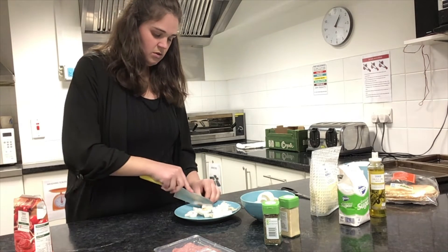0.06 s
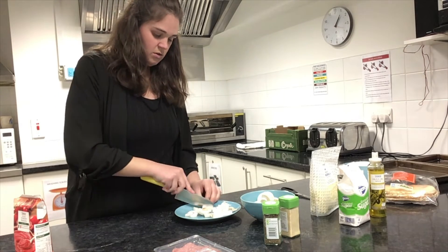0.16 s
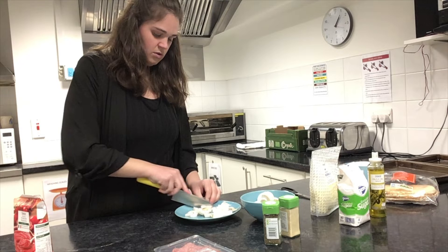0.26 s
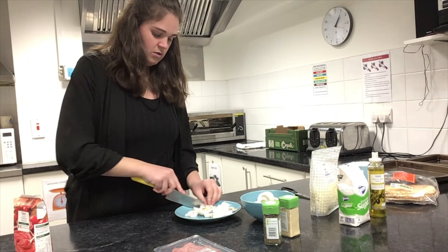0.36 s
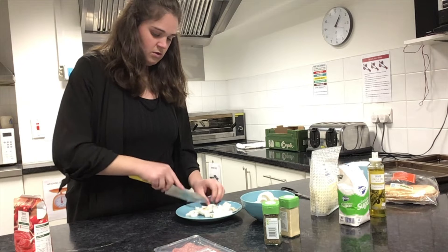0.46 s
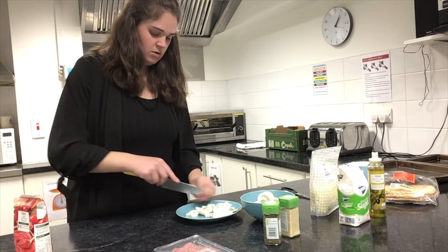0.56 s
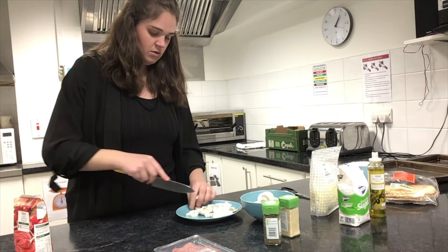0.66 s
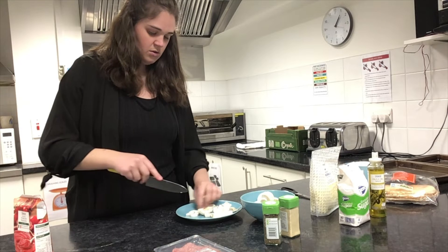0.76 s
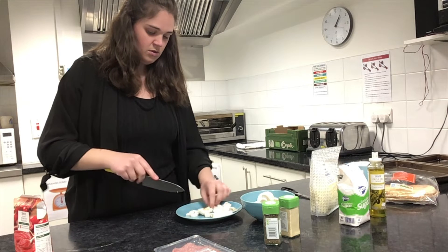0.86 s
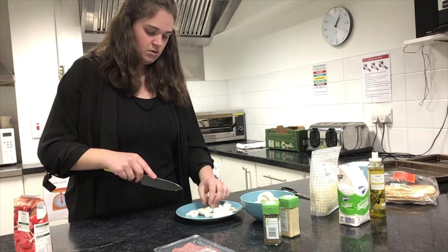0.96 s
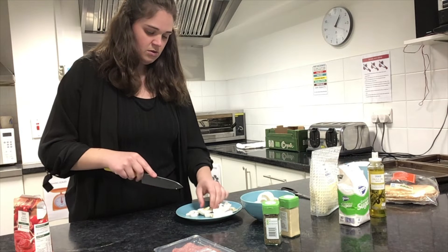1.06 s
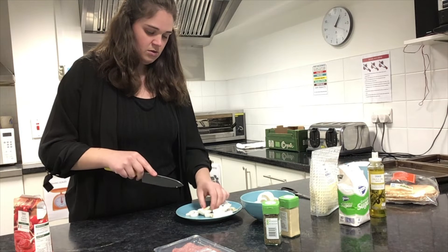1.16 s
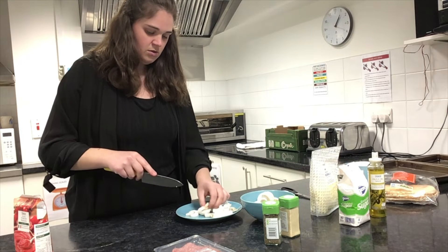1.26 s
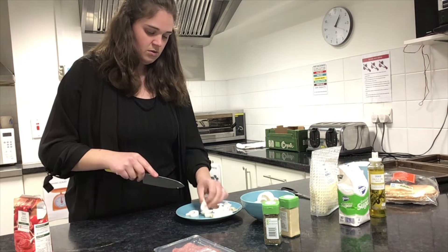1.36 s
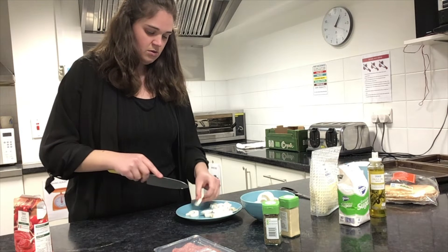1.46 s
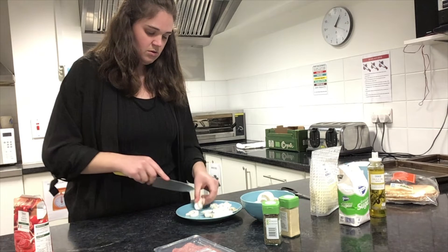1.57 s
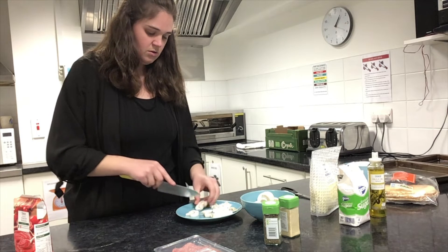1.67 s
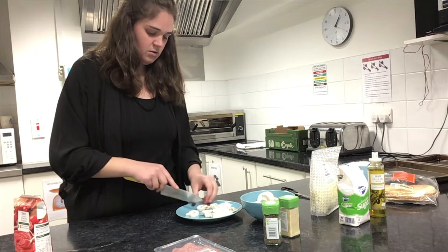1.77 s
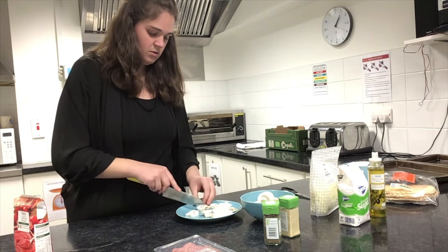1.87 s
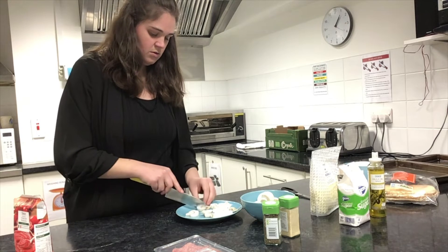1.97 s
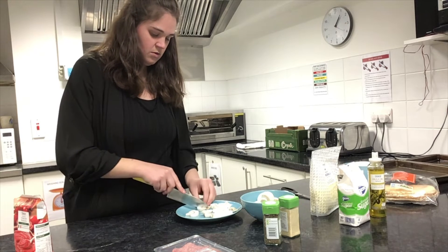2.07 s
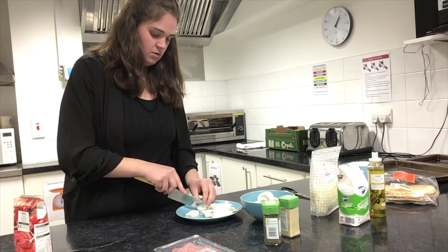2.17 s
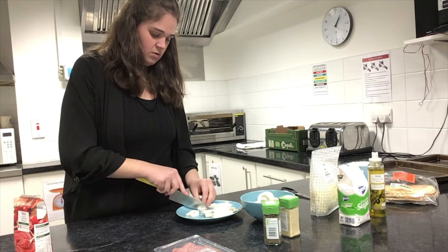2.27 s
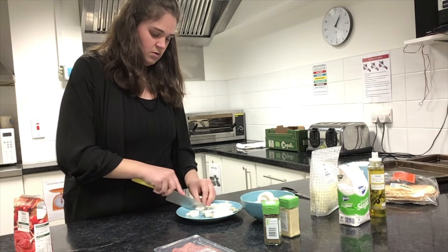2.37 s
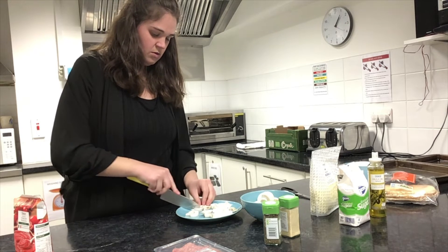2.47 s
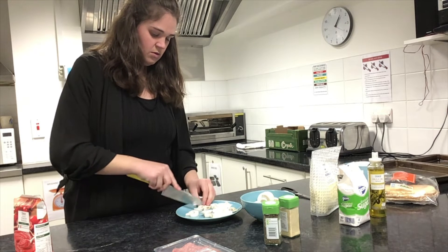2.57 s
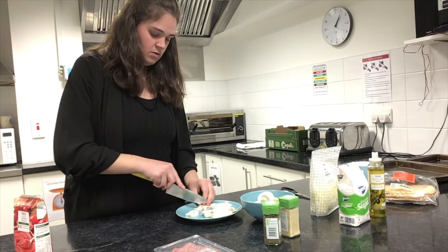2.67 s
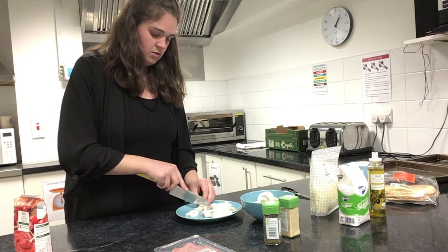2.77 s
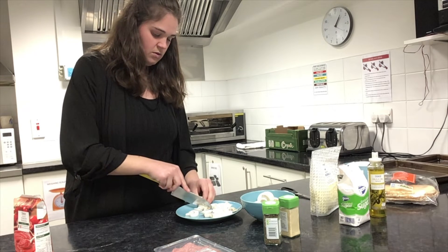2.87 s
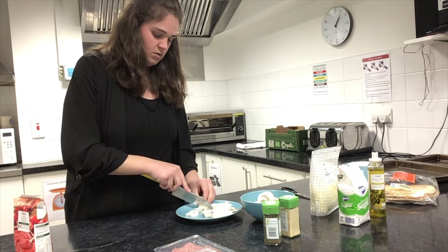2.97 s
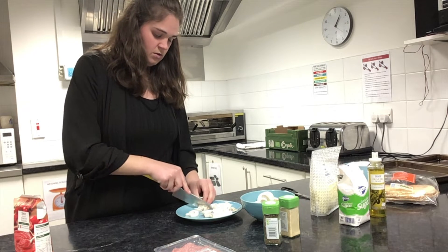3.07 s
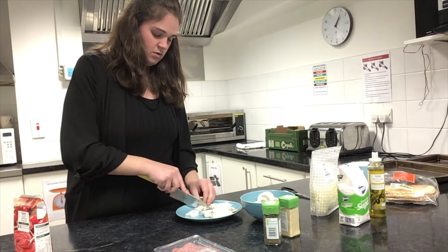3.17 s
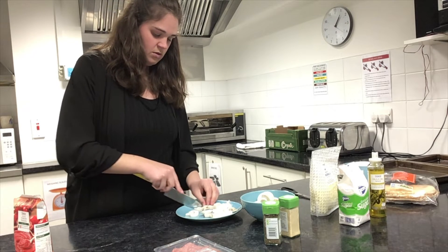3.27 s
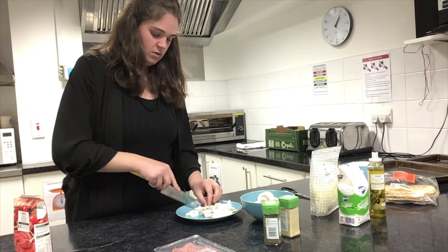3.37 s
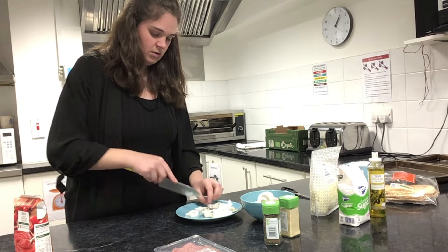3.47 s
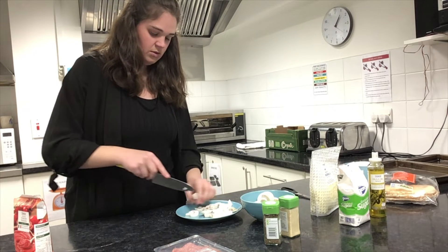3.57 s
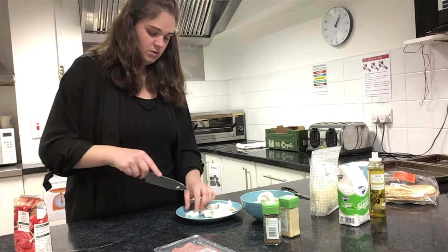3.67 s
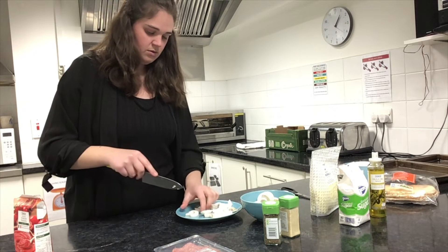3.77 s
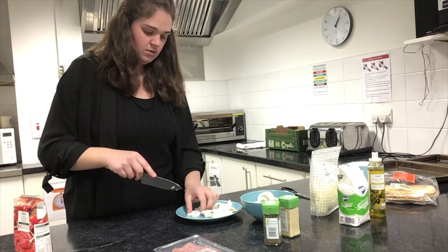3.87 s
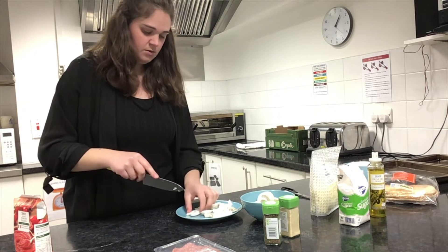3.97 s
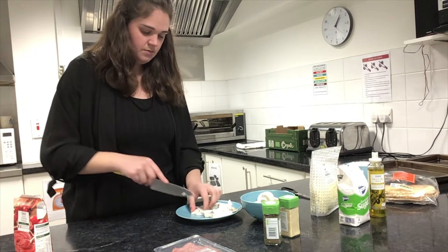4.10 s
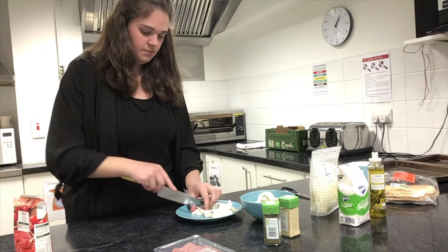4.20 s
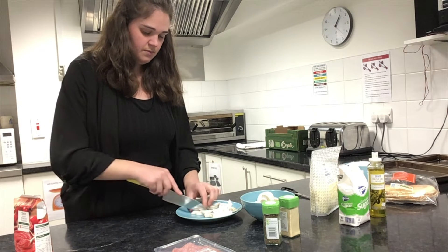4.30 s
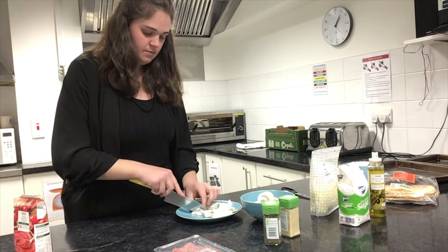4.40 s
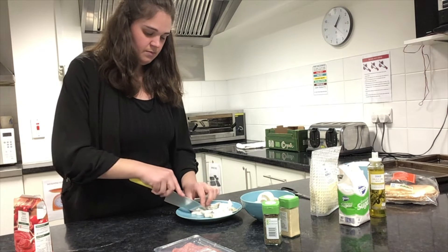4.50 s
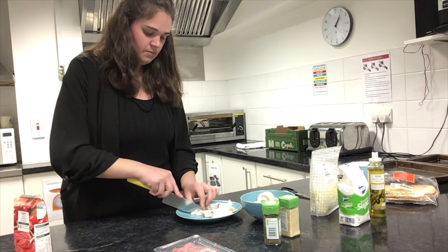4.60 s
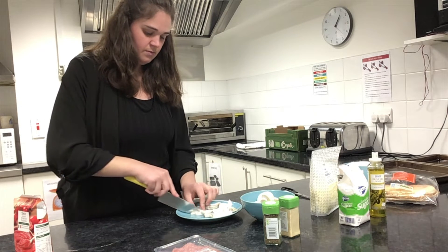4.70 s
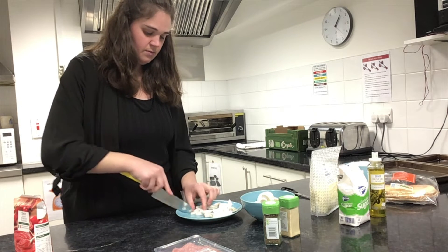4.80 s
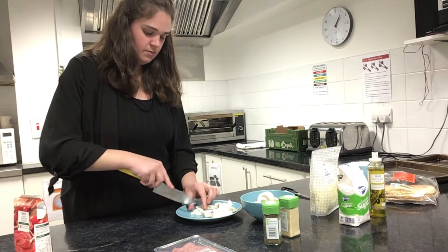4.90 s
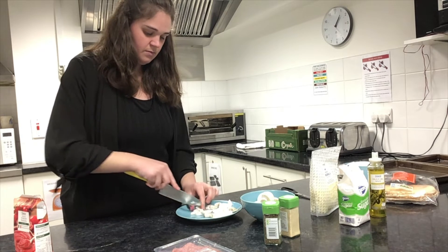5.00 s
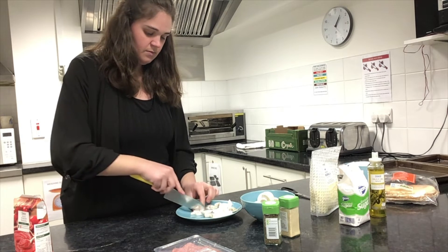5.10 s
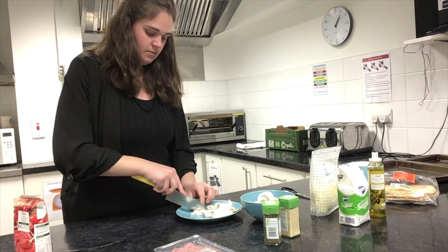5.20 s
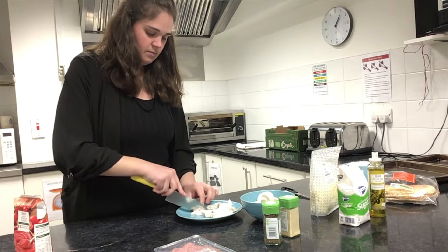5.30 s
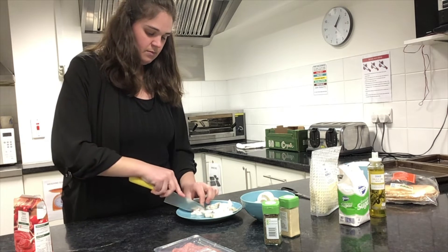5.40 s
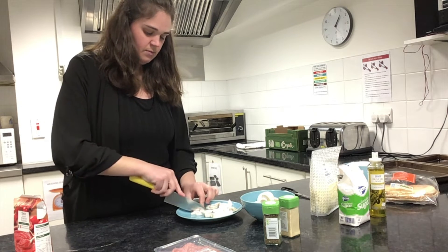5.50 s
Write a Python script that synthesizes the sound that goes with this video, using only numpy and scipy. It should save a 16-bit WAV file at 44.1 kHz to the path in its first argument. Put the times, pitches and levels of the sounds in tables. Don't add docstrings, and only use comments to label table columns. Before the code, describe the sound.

A knife cracks sharply onto a ceramic plate five times, with lighter clinks between, in a tiled kitchen over a faint low hum.

```python
import sys
import numpy as np
from scipy import signal
from scipy.fft import rfft, irfft
from scipy.io import wavfile
from scipy.ndimage import uniform_filter1d

SR = 44100
rng = np.random.default_rng(int(sys.argv[2]) if len(sys.argv) > 2 else 0)


def persist_wave(psi):
    counts = np.round(np.clip(psi, -1, 1) * 32767).astype(np.int16)
    wavfile.write(sys.argv[1], SR, np.atleast_2d(counts).T)


def to_linear_factor(level_db):
    exponent = np.asarray(level_db, float) / 20
    return 10 ** exponent


N = 244622

# freq_hz, level_db
STEADY_BAND = [(20, -3), (45, 0), (15780, 0), (15950, -24)]
# freq_hz, under_cut_db, under_knock_db, t60_s (as heard in the room)
WELL = [(355.2, -7, -9, .25), (470, 1.5, 1, 0.18), (600, -7, -6, .12), (982.6, -3.5, -7.5, 0.22),
        (1330, -17, -14, .15), (1645, 1.1, -6, .22), (1850, -.5, -1.5, .13), (2010, -5.5, -5.5, .2),
        (2410, -9.5, -16.5, .3), (2580, -6.5, -1.3, .4), (2860, -14, -2.5, .12), (3080, -3.5, 4, .18),
        (3310, 1.5, -3, 0.17), (3605, 1.5, -.8, .33)]
# freq_hz, under_cut_db, under_knock_db, t60_s (as heard in the room)
RIM = [(3930, 2.5, 1.5, .22), (4290, -1.2, -7.5, .3), (4660, -3.5, -4.5, .3), (4855, -9, 3.5, .32),
       (5080, -14.5, -3, .25), (6080, 0, -11, .35), (6208, 0.7, 7, .3), (6650, -9, 0.7, .3),
       (7600, -7, -.8, .24), (8620, -5, -7, .24), (9250, -9, -0.8, .28), (11200, 1.5, -1, .2),
       (12780, -4.5, -2.5, .12), (14200, -1.5, -5, .18)]


def evened(x):
    return x / np.sqrt(np.mean(x ** 2) + 1e-20)


def read(points, hz):
    f, value = np.transpose(points)
    return np.interp(np.log(hz + 1), np.log(f + 1), value)


def add(mix, s, sound):
    part = mix[round(s * SR):][:len(sound)]
    part += sound[:len(part)]


def coloured(x, spectrum):
    hz = np.fft.rfftfreq(len(x), 1 / SR)
    return irfft(rfft(x) * to_linear_factor(read(spectrum, hz)), len(x))


def resonate(x, hz, width):
    r = np.exp(-np.pi * abs(width) / SR)
    return 2 * signal.lfilter([1 - r], [1, -r * np.exp(2j * np.pi * hz / SR)], x).real


def appliance():
    # freq_hz, level_db
    air_spectrum = [(15, -41.5), (25, -22.5), (69, -13.5), (101, -5.5), (169, -10), (198, -8.5),
                    (340, -13.5), (567, -12), (782, -23), (871, -20.5), (1050, -25.5), (1270, -24.5),
                    (1410, -27.5), (2630, -27.5), (15500, -44)]
    # freq_hz, width_hz, level_db
    motor = [(100, 13, -96), (71.14, 8, -80), (48.52, 5.3, -79), (140.5, 11, -75.5), (203.7, 6.6, -81.5),
             (235.3, 8.9, -78.5), (470, 14, -83.5), (506, 18, -88), (886, 26, -80), (1300, 12, -86.5),
             (2700, 19, -88)]
    air_db, mains_db, hiss_db = -65.5, -65.5, -87

    swell = rng.standard_normal(N)
    for _ in range(2):
        swell = uniform_filter1d(swell, 9000)
    air = to_linear_factor(air_db + 0.6 * evened(swell)) * evened(coloured(rng.standard_normal(N), air_spectrum))
    hiss = to_linear_factor(hiss_db) * rng.standard_normal(N)
    mains = to_linear_factor(mains_db) * np.sqrt(2) * np.sin(2 * np.pi * 99.8 * np.arange(N) / SR)
    hum = air + hiss + mains
    for hz, width, db in motor:
        line = resonate(resonate(rng.standard_normal(N), hz, width), hz, width)
        hum += to_linear_factor(db) * evened(line)
    return coloured(hum, STEADY_BAND)


def stroke(landing, db, rise_db):
    # freq_hz, level_db
    flesh = [(470, -24.5), (800, 6), (1430, -6.5), (1670, -3.5), (2510, -6.5), (4180, -3.5), (6220, -7),
             (12000, -25), (15600, -56.5), (22000, -120)]
    slide_s = 0.061
    t = np.arange(-slide_s, 0, 1 / SR)
    noise, grain = rng.standard_normal((2, SR))
    grain_db = 5.3 * evened(uniform_filter1d(grain, 90))
    fibres = evened(coloured(noise * to_linear_factor(grain_db), flesh))[:len(t)]
    return landing - slide_s, to_linear_factor(db + rise_db * t) * fibres * signal.windows.tukey(len(t), 0.1)


def touch(s, db, hz, width, length):
    t = np.arange(8192) / SR
    puff = resonate(resonate(rng.standard_normal(len(t)), hz, width), hz, width)
    return s, to_linear_factor(db) * evened(puff) * np.exp(-t / length) * np.minimum(t / 0.00089, 1)


def favoured(hz, tones, lifts_db, reaches):
    lift_db = 0
    for tone, db, reach in zip(tones, lifts_db, reaches):
        lift_db = lift_db + db * np.exp(-(np.log2((abs(hz) + 1) / tone) / reach) ** 2)
    return lift_db


def struck(spectrum, centres, strength_db, spot, bump_db):
    size = 4096
    signed_hz = np.fft.fftfreq(size, 1 / SR)
    hz = abs(signed_hz)

    height = np.clip(1 + strength_db / 14, 0, 1.5)[:, None]
    bumps = (height / (1 + ((hz / centres[:, None] - 1) / 0.016) ** 2)).max(0)
    bumps *= 1 + 0.6 * np.clip(hz / 9000, 0, 1)
    edge_db = -60 * np.clip((hz - 16000) / 700, 0, 1)
    gain_db = read(spectrum, hz) + bump_db * bumps + favoured(hz, *spot) + edge_db
    log_gain = np.log(to_linear_factor(np.maximum(gain_db, -100)))

    scatter = np.repeat(rng.random(129), 16)[:2049] * 0.004
    scatter *= np.clip(np.arange(2049) / 900, 0, 1) ** 2
    drift = 2 * np.pi * np.cumsum(scatter) * SR / size
    bins = abs(np.fft.fftfreq(size, 1 / size)).astype(int)
    bending = 4 * np.pi * 0.0014 * np.sqrt(1000 * hz)
    lag = np.sign(signed_hz) * (bending + drift[bins])

    causal_phase = signal.hilbert(log_gain).imag
    return np.fft.ifft(np.exp(log_gain - 1j * (causal_phase + lag))).real[:2048]


def ring(modes, t):
    hz, db, t60 = np.transpose(modes)[:, :, None]
    pair = np.sin(2 * np.pi * hz * t) + 0.45 * np.sin(2 * np.pi * hz * 1.011 * t)
    return (to_linear_factor(db - 60 * t / np.clip(0.67 * t60, 0.02, 0.26)) * pair).sum(0)


def blow(row, colour, radiated, favour, strength_db, ring_db):
    # start_s, free_1_hz, free_2_hz, gap_1_hz, gap_2_hz
    grips = [(0.124, 4650, 1645, 2950, 5200), (2.237, 6080, 600, 2446, 1515),
             (3.091, 3310, 970, 2590, 11200), (4.605, 2410, 4855, 2860, 5500),
             (5.408, 6080, 2410, 2837, 5250), (2.439, 2860, 3930, 6050, 2400),
             (2.491, 2585, 3605, 5400, 2300), (3.346, 1850, 3930, 5770, 3520),
             (4.793, 2585, 356, 5630, 1350)]
    free_db, free_octaves = 6, 0.03
    gap_db, gap_octaves = -8, 0.08
    free_after_s = 0.0058

    s, db, room_db, *tones = row
    _, *grip = min(grips, key=lambda held: abs(held[0] - s))
    hz, _, _, t60 = np.transpose(WELL + RIM)
    strength_db = strength_db + favoured(hz, grip[:2], [free_db] * 2, [free_octaves] * 2)
    tones = tones + grip[2:]
    gaps = [(gap_db, 0.23 * gap_db, gap_octaves)] * 2
    crack_db, sent_db, reaches = np.transpose(favour + gaps)

    t = np.arange(SR // 2) / SR
    ringing_db = read(radiated, hz) + 0.7 * strength_db + favoured(hz, tones, sent_db, reaches)
    free = ring(np.transpose([hz, ringing_db, t60]), t) * np.minimum(t / free_after_s, 1) ** 2
    paths = np.array([[0], [0.8], [1]])
    sound = to_linear_factor(ring_db) * free / abs(free).max() * paths

    crack = evened(struck(colour, hz, strength_db, (tones, crack_db, reaches), bump_db=9.0))
    sent = evened(struck(radiated, hz, strength_db, (tones, sent_db, reaches), bump_db=9.5))
    peak = abs(crack).max()
    add(sound[0], 0, crack / peak)
    add(sound[1], 0, to_linear_factor(room_db) * sent / peak)
    return s - 0.0006, to_linear_factor(db) * sound


def cut(row):
    # freq_hz, level_db
    crack_colour = [(70, -54.5), (139, -18), (364, -23), (892, -20), (1006, -11), (6526, -13.5),
                    (7021, -19.5), (16318, -35.5)]
    # freq_hz, level_db
    wall_colour = [(88, -50.5), (280, -17), (506, -7), (663, -21), (2291, -13.5), (5904, -11.5),
                   (7341, -19.5), (15389, -31)]
    # crack_lift_db, sent_lift_db, reach_octaves
    favour = [(11, 6, .21), (8.7, 9.9, .16)]
    strength_db = np.transpose(WELL + RIM)[1]
    return blow(row, crack_colour, wall_colour, favour, strength_db, ring_db=-23)


def knock(row):
    # freq_hz, level_db
    crack_colour = [(71, -52.5), (111, -11), (636, -13.5), (680, -20.5), (959, -4.5), (5062, -13),
                    (11208, -40), (16425, -41.5)]
    # freq_hz, level_db
    wall_colour = [(88, -40.5), (300, -16), (429, -5.5), (1334, -16), (2602, -14.5), (5035, -16.5),
                   (7192, -28), (12484, -44)]
    # crack_lift_db, sent_lift_db, reach_octaves
    favour = [(5.4, 2.2, 1), (13, 8, .11)]
    strength_db = np.transpose(WELL + RIM)[2]
    return blow(row, crack_colour, wall_colour, favour, strength_db, ring_db=-15)


def thud(s, db):
    t = np.arange(SR // 2) / SR
    sway = (t / 0.05 * np.exp(1 - t / 0.05)) ** 2
    return s, to_linear_factor(db) * np.sin(2 * np.pi * 64 * t) * sway


def kitchen(direct, radiated):
    # freq_hz, t60_s
    tile_decay = [(100, 0.9), (400, 0.42), (1000, 0.4), (2500, 0.39), (5000, 0.38), (9000, 0.33),
                  (15000, 0.32)]
    # delay_s, level_db
    echoes = [(.0022, -4.5), (.0045, -18), (.0066, -12.5), (.0087, -3), (.0128, -14.5), (.017, -17)]
    tail_db, near_db, near_t60 = -4, 0.5, 0.07

    taps = np.zeros(SR)
    at = np.arange(200, SR - 20, 10) + rng.integers(0, 10, (SR - 211) // 10)
    taps[at] = rng.choice([-1., 1.], at.shape)
    hz, t, z = signal.stft(taps, SR, nperseg=256)
    decay_db = -60 * t / read(tile_decay, hz)[:, None]
    tail = signal.istft(z * to_linear_factor(decay_db + read(STEADY_BAND, hz)[:, None]), SR, nperseg=256)[1]
    tail *= to_linear_factor(tail_db) / np.linalg.norm(tail)

    near = taps[130:] * to_linear_factor(-60 * np.arange(SR - 130) / SR / near_t60)
    near *= to_linear_factor(near_db) / np.linalg.norm(near)
    near[0] += 1
    for k, (s, db) in enumerate(echoes):
        near[round(s * SR)] += (-1) ** k * to_linear_factor(min(db, -8))
    return signal.fftconvolve(direct, near)[:N] + signal.fftconvolve(radiated, tail)[:N]


def scene():
    # landing_s, level_db, rise_db_per_s
    strokes = [
        (0.118, -56.5, 901.5),
        (2.231, -57, 700),
        (3.085, -57.5, 801),
        (4.599, -57.5, 551),
        (5.402, -63.5, 700),
    ]
    # start_s,
    # level_db, centre_hz, width_hz, length_s
    touches = [(0.108, -58, 4300, 900, 0.0078), (0.453, -67.5, 4500, 1500, 0.028),
               (0.451, -75, 6500, 300, 0.01), (0.33, -71, 4620, 70, 0.19), (1.75, -59, 960, 200, 0.008),
               (1.752, -61, 600, 151, 0.011), (2.948, -75.5, 5000, 2940, 0.011),
               (3.373, -65, 1000, 800, 0.017), (3.646, -70.5, 750, 100, 0.041),
               (3.842, -83, 6470, 200, .06), (3.927, -68, 665, 100, 0.029), (4.514, -74, 2700, 200, 0.01),
               (2.492, -39, 1400, 600, 0.013), (2.495, -50, 190, 120, 0.034), (4.799, -51, 396, 140, 0.034),
               (5.162, -77, 2500, 2504, .05), (5.183, -62, 3080, 717, 0.0096),
               (5.184, -58.5, 996, 585, 0.012), (5.192, -56, 2000, 1186, 0.004),
               (5.209, -75.5, 6220, 200, 0.013), (5.212, -55.5, 470, 91.5, 0.05),
               (5.224, -70, 1920, 300, 0.017), (5.228, -69, 3140, 300, 0.0072),
               (5.385, -57.5, 4260, 3130, 0.017)]
    # start_s, blow_db, sent_to_room_db, first_tone_hz, second_tone_hz
    cuts = [
        (0.124, -7, -2.5, 575, 4450),
        (2.237, -5, -2, 4150, 1850),
        (3.091, -8, -3, 549, 2000),
        (4.605, -4, -0.05, 5030, 2194),
        (5.408, -6.5, 6.5, 4104, 2194),
    ]
    # start_s, blow_db, sent_to_room_db, first_tone_hz, second_tone_hz
    knocks = [
        (2.439, -17, 2.2, 7100, 780),
        (2.491, -10.5, -4.5, 1350, 1028),
        (3.346, -26.5, 0, 2160, 1004),
        (4.793, -19.5, -3, 630, 3730),
    ]
    # start_s, level_db
    thuds = [
        (0.13, -64),
        (2.252, -71),
        (2.506, -51.5),
        (3.1, -68),
        (3.36, -65),
        (4.61, -56.5),
        (5.41, -58),
    ]

    crack, walls, free_ring, light, worktop = np.zeros((5, N))
    for row in strokes:
        add(light, *stroke(*row))
    for row in touches:
        add(light, *touch(*row))
    for s, sound in [cut(row) for row in cuts] + [knock(row) for row in knocks]:
        for path, part in zip((crack, walls, free_ring), sound):
            add(path, s, part)
    for row in thuds:
        add(worktop, *thud(*row))
    room = to_linear_factor(-1.5) * kitchen(crack + light, walls + light)
    return (room + free_ring + worktop + appliance())[None]


def top_cut(x):
    return signal.sosfilt(signal.butter(12, 16840, fs=SR, output="sos"), x)


def record(dry):
    return top_cut(dry)


dry = scene()
out = record(dry)
persist_wave(out)
```